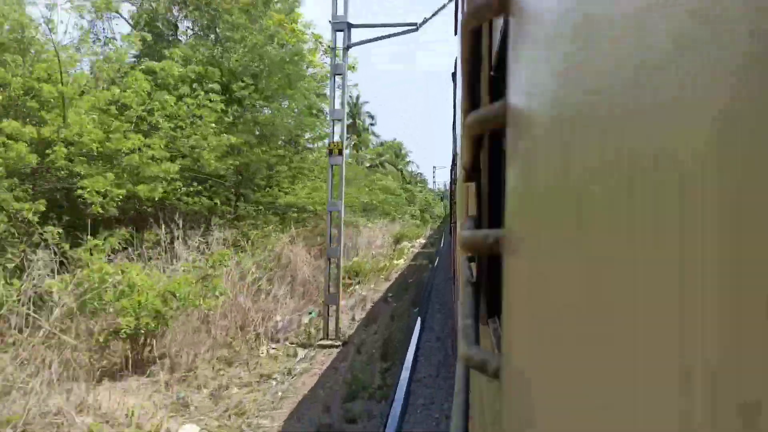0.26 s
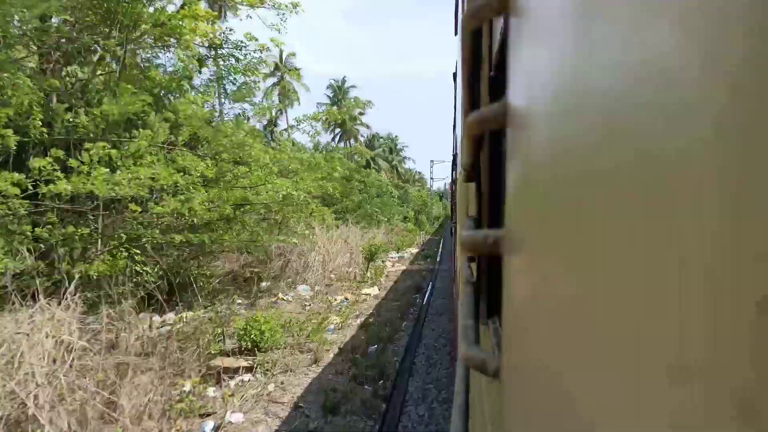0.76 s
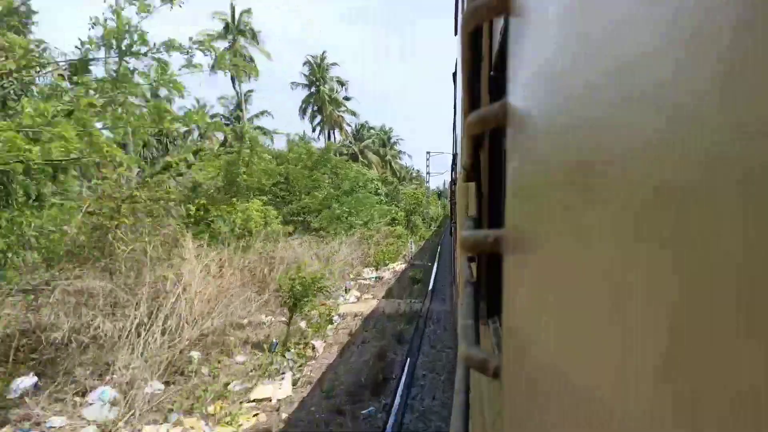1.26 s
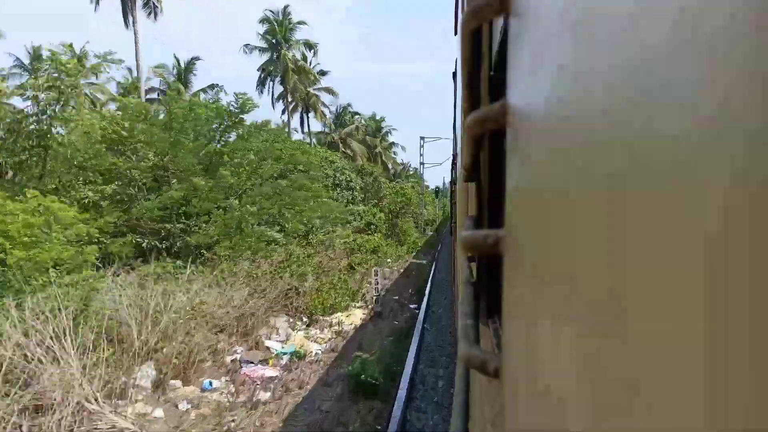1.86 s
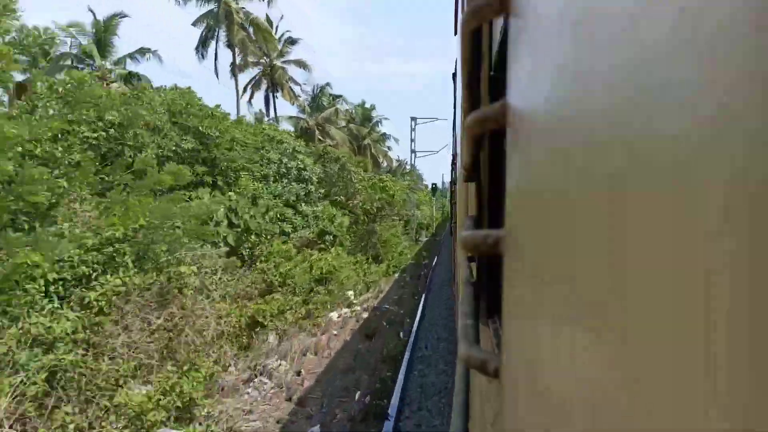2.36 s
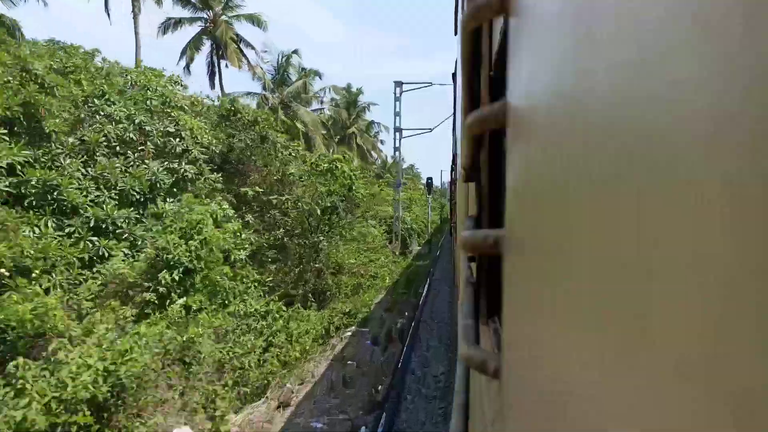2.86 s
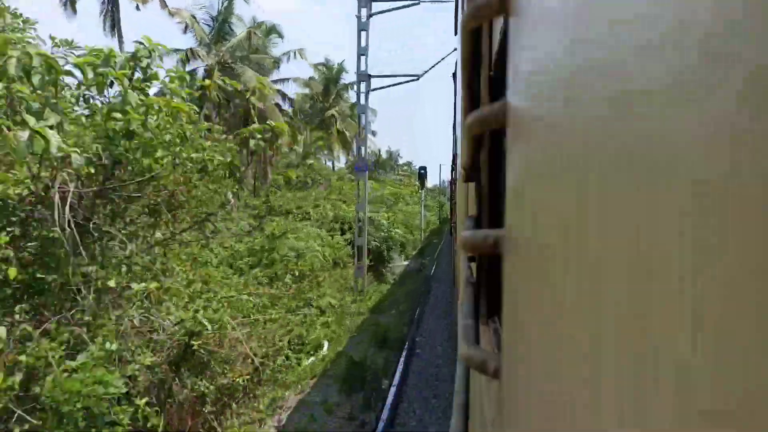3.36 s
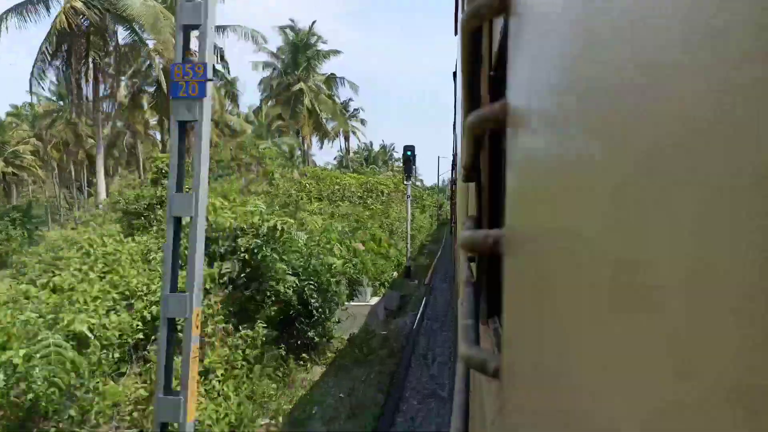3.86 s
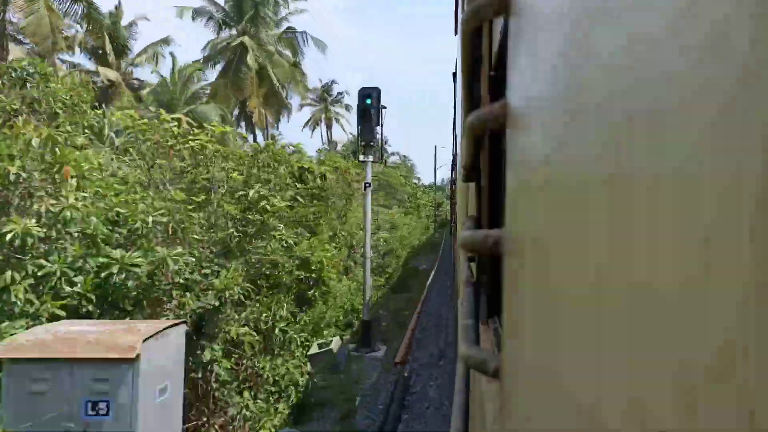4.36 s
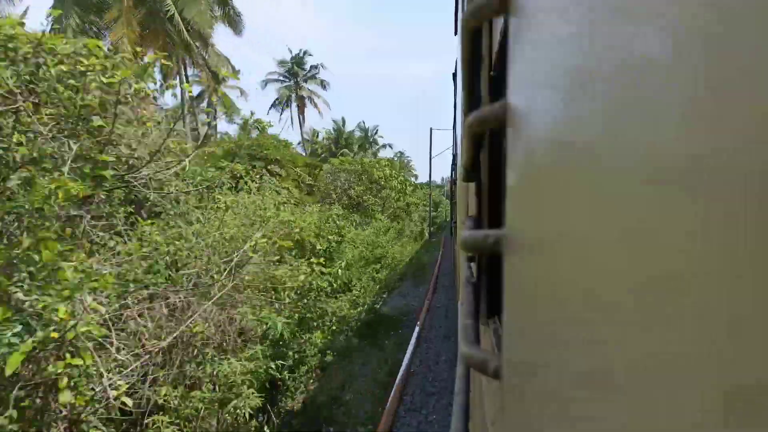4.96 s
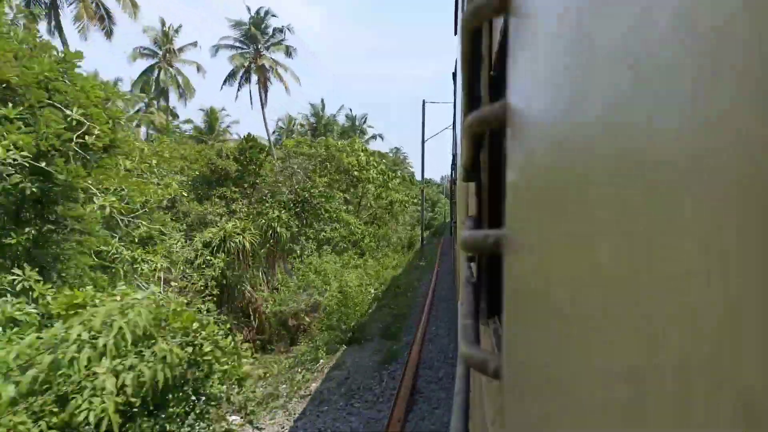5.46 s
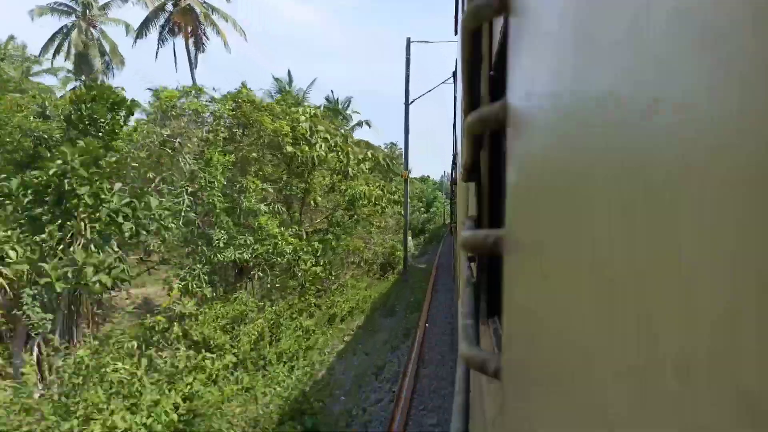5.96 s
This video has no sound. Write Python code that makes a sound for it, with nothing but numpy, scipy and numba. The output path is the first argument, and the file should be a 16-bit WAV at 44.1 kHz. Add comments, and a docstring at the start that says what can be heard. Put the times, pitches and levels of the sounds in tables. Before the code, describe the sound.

A passenger coach runs at steady high speed, heard close up in mono from its open doorway. A low, rough rumble, mid-range wheel roar and soft hiss continue throughout, with a very faint high ringing of the wheels. The rumble is heaviest at the start, and a hollow bogie drone colours it until about 1.3 s, then sinks. Clusters of dull, booming thumps with loose clatter fall near 0.1, 0.8, 1.5, 2.2, 2.9, 3.5, 4.2 and 4.8 s; each leading blow is followed about 0.16 s later by a second, often softer one, with lighter knocks before. Extra blows fill 0.4-0.6 s. The hardest double bang comes at 5.2-5.4 s, then rattling knocks gather from 5.65 to 6 s. Loud blows push the rolling noise down; it swells back in the gaps.

```python
"""A passenger coach at speed, heard from its open doorway: axles thump and clatter over joints and rough spots.
Each blow is a staggering body boom plus enveloped clatter noise from loose bogie parts.
Rough rails make the body rumble, the wheels roar and hiss, and the bogie drone, all as coloured noise.
The wheel discs ring faintly, as very narrow noise bands.
A limiter ducks at loud knocks, so the rolling noise drops away and swells back."""
import sys
import numpy as np
from scipy import signal
from scipy.fft import rfft, irfft
from scipy.io import wavfile
from scipy.ndimage import uniform_filter1d
from numba import njit

SR = 44100
rng = np.random.default_rng(int(sys.argv[2]) if len(sys.argv) > 2 else 0)


def master(y):
    """Save y as 16-bit WAV."""
    cut = np.clip(np.atleast_2d(y).T, -1, 1)
    pcm = np.round(cut * 32767)  # scale
    wavfile.write(sys.argv[1], SR, pcm.astype(np.int16))


N = 273420
T = np.arange(N) / SR
FREQ_HZ = np.maximum(np.arange(N // 2 + 1) * SR / N, 1)

# Rail joints, mostly one rail length apart. Each row: time under the leading axle underfoot [s],
# leading thump [dB], trailing thump [dB], leading clatter [dB]; levels before the shared trims in knocks().
JOINTS = [(.14, -4, -11.5, -14), (.824, 0, -13.5, -25), (1.502, .5, -3, -18), (2.17, -6, -17, -30.5),
          (2.863, -4.5, -7, -28.5), (3.5, 0.5, -16, -19), (4.164, -4, -9.5, -17.5),
          (4.83, -12, -5.5, -21.5), (5.205, 3.5, 1.5, -14), (5.978, -12, -7.5, -19)]
# Wheels that cross every joint before the bogie underfoot. Each row: distance ahead [m],
# blow length [s], thump before trim [dB], clatter relative to the joint's [dB].
FAR_AXLES = [(6.9, 0.02, -12.5, -5.5), (2.8, 0.036, -10.5, 1)]
# Further single blows, at rough spots or as part of a joint's clatter. Each row: time [s], thump [dB],
# clatter [dB]; levels before the trims.
SINGLE_BLOWS = [(.425, -5.5, -26), (0.457, -6.5, -21.5), (0.574, -8, -30), (1.275, -13, -25.5),
                (2.641, -11.5, -41), (3.287, -20.5, -24.5), (4.797, -7.5, -19), (5.652, -13.5, -12),
                (5.751, -19, -12.5), (5.878, -8.5, -17.5), (5.994, -15, -13)]
# Relative colour of the bogie's clatter. Each row: frequency [Hz], density [dB per Hz].
CLATTER_COLOUR = [(120, -33), (250, 4.5), (420, 6), (650, 1), (1050, -4), (1350, -15.5), (2400, -20.5),
                  (4000, -30), (9000, -59)]
# Relative colour of the rolling contact. Each row: frequency [Hz], density [dB per Hz].
ROLL_COLOUR = [(35, -38), (65, -43.5), (82, -22), (103, 1), (175, 3), (250, -7.5), (290, -7.5), (520, -17),
               (780, -21), (1300, -27), (4000, -38.5), (7000, -52.5), (10000, -59), (15500, -64)]
# Resonances of coach body, bogie, rail and wheel. Each row: frequency [Hz], width [Hz], lift [dB].
RESONANCES = [(124, 7.3, 1), (243.7, 30.5, 7.5), (322, 11, 2.5), (452, 73, 0.5), (939, 135, 5.5),
              (1086, 100, 5.5), (1994, 174, 4), (2654, 100, 5), (4500, 150, 2.5), (5900, 550, 4)]
# Rolling levels along the rail. Each row: time [s], body rumble [dB], wheel roar [dB], hiss [dB];
# rumble and roar are before flutter.
RAIL = [(0, -11, -20.5, -32.5), (.65, -14.5, -26.5, -33.5), (1.302, -15.5, -26, -36),
        (2.05, -18, -24, -34.5), (2.6, -16, -22, -31), (3.6, -18.5, -25.5, -34.5),
        (4.55, -18.5, -22.5, -32), (5, -15.5, -21.5, -32), (5.6, -17.5, -20.5, -31), (6.2, -20.5, -28, -37)]
# Thin ringing of the wheel discs. Each row: frequency [Hz], level [dB].
WHEEL_RINGS = [(6445, -75), (6626, -67), (7780, -78), (7955, -71), (8043, -72.5), (8219, -77)]

START_SPEED_M_S, ACCELERATION_M_S2 = 17.7, 0.2503
WHEELBASE_M = 2.93  # between the two axles underfoot
LEADING_LENGTH_S, TRAILING_LENGTH_S, SINGLE_LENGTH_S = .027, .028, .02
TRAILING_CLATTER_DB = -3.5  # relative to the leading axle
THUMP_HZ, THUMP_HZ_PER_DB = 188.1, 0.97  # pitch at 0 dB before trim; softer blows boom lower
BLOW_SAMPLES = SR // 4
# Rippled rail makes the bogie drone, then the drone sinks.
RIPPLE_DRONE_DB, SMOOTH_DRONE_DB = -24.5, -34
RIPPLE_ENDS_S, RIPPLE_FADE_S = 1.24, .25
RELEASE_DB_PER_S, HOLD_S = 33, .06  # of the limiter's overshoot
TOP_HZ = 15750


def knocks(thump_trim_db=-0.07, clatter_trim_db=-1.0, boom_rise_s=0.0044, boom_length_share=0.874,
           boom_ring_s=0.016, clatter_ring_s=0.022, clatter_rise_share=0.12):
    """Each blow booms the body and shakes loose bogie parts; longer clatters build up more slowly."""
    thumps, shake = np.zeros(N), np.zeros(N)
    for start_s, length_s, boom_db, loose_db in strikes():
        boom = thump(THUMP_HZ + THUMP_HZ_PER_DB * boom_db)
        boom_envelope = blow(boom_length_share * length_s, boom_rise_s, boom_ring_s)
        add(thumps, undb(boom_db + thump_trim_db) * boom_envelope * boom, start_s)
        clatter_envelope = blow(length_s, clatter_rise_share * length_s, clatter_ring_s)
        add(shake, undb(loose_db + clatter_trim_db) * clatter_envelope, start_s)
    # the microphone takes little deep bass from the thumps
    thumps = signal.sosfilt(signal.butter(4, 90, "high", fs=SR, output="sos"), thumps)
    return thumps + shake * noise(colour(CLATTER_COLOUR))


def strikes():
    """Blows as (start s, length s, thump dB, clatter dB): four axles cross each joint; starts below 0 drop."""
    blows = [(s, SINGLE_LENGTH_S, boom_db, loose_db) for s, boom_db, loose_db in SINGLE_BLOWS]
    for joint_s, leading_db, trailing_db, loose_db in JOINTS:
        speed_m_s = START_SPEED_M_S + ACCELERATION_M_S2 * joint_s
        for ahead_m, length_s, boom_db, extra_db in FAR_AXLES:
            blows.append((joint_s - ahead_m / speed_m_s, length_s, boom_db, loose_db + extra_db))
        blows.append((joint_s, LEADING_LENGTH_S, leading_db, loose_db))
        trailing_s = joint_s + WHEELBASE_M / speed_m_s
        blows.append((trailing_s, TRAILING_LENGTH_S, trailing_db, loose_db + TRAILING_CLATTER_DB))
    return [b for b in blows if b[0] >= 0]


def blow(length_s, rise_s, ring_s):
    """Envelope of a knock: builds up, lasts while the wheel chatters, rings out exponentially."""
    t = T[:BLOW_SAMPLES]
    rise = np.sin(np.pi / 2 * np.minimum(t / rise_s, 1)) ** 2
    ring_out = np.exp(-np.maximum(t - length_s, 0) / ring_s)
    return rise * ring_out


def thump(hz, stagger_hz=40, panel_db=-8):
    """Body boom whose pitch staggers as the wheel rebounds; floor panels shudder its level. Rms 1."""
    stagger = slow_noise()
    swing = 1 + undb(panel_db) * np.tanh(slow_noise())
    phase = 2 * np.pi * np.cumsum(hz + stagger_hz * stagger) / SR
    return unit(swing * np.sin(phase))


def slow_noise():
    """Noise below 80 Hz, one blow long, rms 1, cut from the middle to avoid filter edges."""
    low_pass = signal.butter(2, 80, fs=SR, output="sos")
    smooth = signal.sosfiltfilt(low_pass, rng.standard_normal(3 * BLOW_SAMPLES))
    return unit(smooth[BLOW_SAMPLES:2 * BLOW_SAMPLES])


def rolling(body_hz=330, rail_hz=1300, drone_hz=405, drone_width_hz=90,
            rumble_flutter_db=2.55, roar_flutter_db=0.3):
    """Rail roughness shakes body, wheels and rail together; each radiates its own range."""
    lift_db = sum(db * hump(hz, width_hz) for hz, width_hz, db in RESONANCES)
    gain = colour(ROLL_COLOUR) * undb(lift_db)
    # power shares below the two crossovers
    below_body = 1 / (1 + (FREQ_HZ / body_hz) ** 12)
    below_rail = 1 / (1 + (FREQ_HZ / rail_hz) ** 12)
    rail_s, *columns = np.transpose(RAIL)
    rumble_db, roar_db, hiss_db = (np.interp(T, rail_s, c) for c in columns)
    fade_s = [RIPPLE_ENDS_S, RIPPLE_ENDS_S + RIPPLE_FADE_S]
    drone_db = np.interp(T, fade_s, [RIPPLE_DRONE_DB, SMOOTH_DRONE_DB])
    roughness = walk(15)
    rumble = noise(gain * np.sqrt(below_body)) * undb(rumble_db + rumble_flutter_db * roughness)
    roar = noise(gain * np.sqrt((1 - below_body) * below_rail))
    roar = roar * undb(roar_db + roar_flutter_db * roughness)
    hiss = noise(gain * np.sqrt(1 - below_rail)) * undb(hiss_db)
    drone = noise(hump(drone_hz, drone_width_hz)) * undb(drone_db)  # one bogie resonance
    return rumble + roar + hiss + drone


def wheel_rings():
    """Lightly damped disc modes, kept ringing by the rolling contact."""
    return sum(undb(db) * noise(hump(hz, 7.5)) for hz, db in WHEEL_RINGS)


def undb(db):
    """Decibels to gain."""
    return 10 ** (np.asarray(db) / 20)


def unit(x):
    """Scale to rms 1."""
    return x / np.sqrt(np.mean(x ** 2))


def colour(points):
    """Gain at every frequency from (Hz, dB) points, interpolated over log frequency."""
    hz, db = np.transpose(points)
    return undb(np.interp(np.log(FREQ_HZ), np.log(hz), db))


def hump(hz, width_hz):
    """A bell on the frequency axis, half high at the edges of its width."""
    return .5 ** ((2 * (FREQ_HZ - hz) / width_hz) ** 2)


def noise(gain):
    """Noise of rms 1 with this relative gain at every frequency."""
    return unit(irfft(rfft(rng.standard_normal(N)) * gain, N))


def walk(rate_hz):
    """Smooth random curve of rms 1 that changes about rate_hz times a second."""
    return noise(np.exp(-(np.arange(len(FREQ_HZ)) * SR / N / rate_hz) ** 2))


def add(track, sound, start_s):
    """Mix a sound into the track from start_s."""
    start = max(int(start_s * SR), 0)
    track[start:start + len(sound)] += sound[:N - start]


def scene():
    """All that reaches the doorway."""
    return (knocks() + rolling() + wheel_rings())[None]


@njit
def overshoot(size, peak, hold, fall):
    """Peak follower: jumps up, waits hold samples, then sinks by the factor fall each sample, to 1 at least."""
    out, wait = np.empty(len(size)), hold
    for i in range(len(size)):
        wait -= 1
        if size[i] > peak:
            peak, wait = size[i], hold
        elif wait < 0:
            peak = max(peak * fall, 1.)
        out[i] = peak
    return out


def record(dry, ceiling_db=-10.0, ratio=8, start_over_db=8):
    """A fast limiter with a slow recovery, already at work from the start; then the top is cut."""
    x = dry[0]
    loudness = np.sqrt(np.abs(uniform_filter1d(x ** 2, size=150)))  # rms over 3.4 ms
    fall = float(undb(-RELEASE_DB_PER_S / SR))
    over = overshoot(loudness / undb(ceiling_db), float(undb(start_over_db)), float(HOLD_S * SR), fall)
    gain = over ** (1 / ratio - 1)
    top_cut = signal.ellip(10, .2, 80, TOP_HZ, fs=SR, output="sos")
    return signal.sosfilt(top_cut, x * gain)[None]


dry = scene()
out = record(dry)
master(out)
```